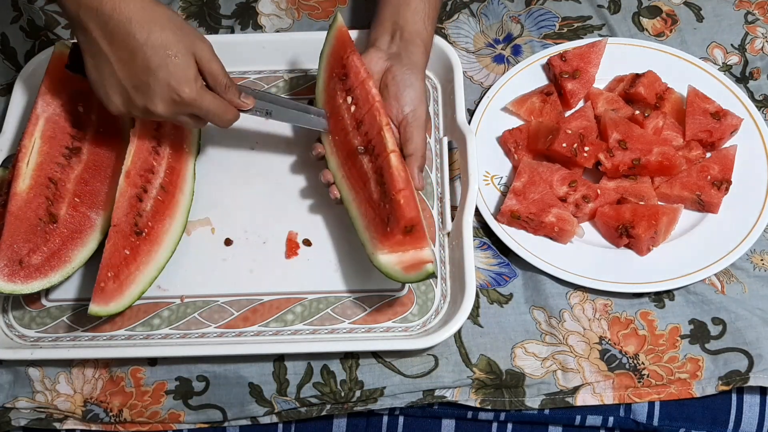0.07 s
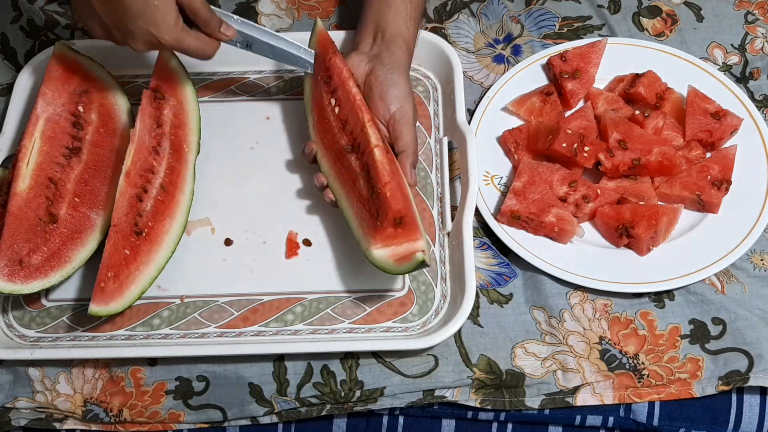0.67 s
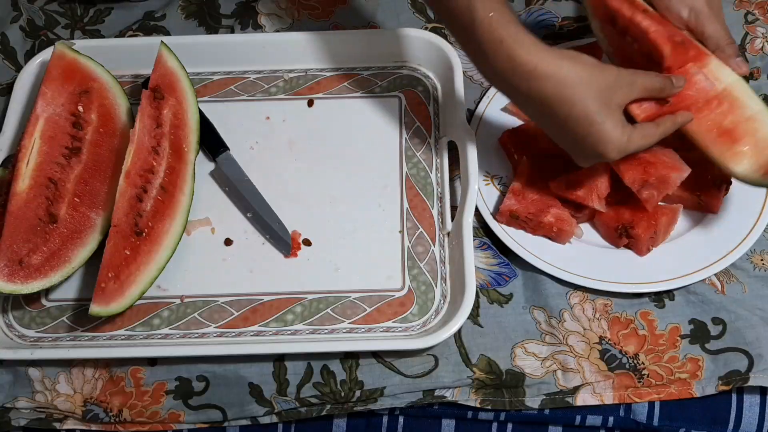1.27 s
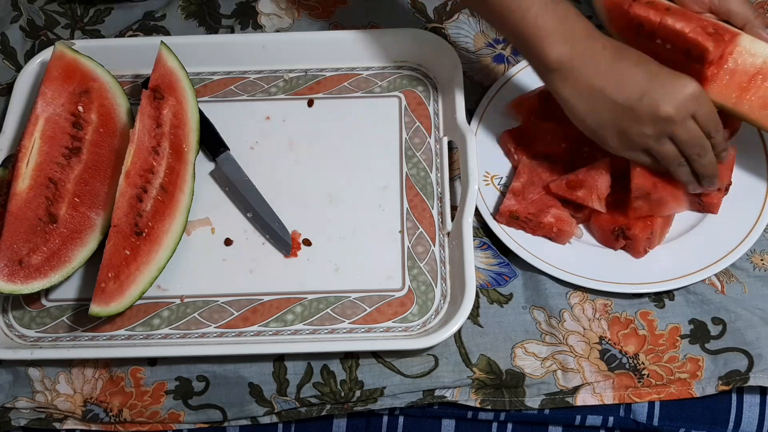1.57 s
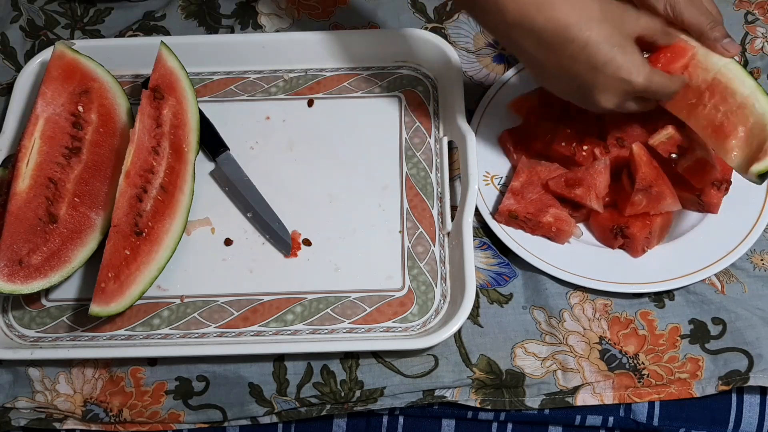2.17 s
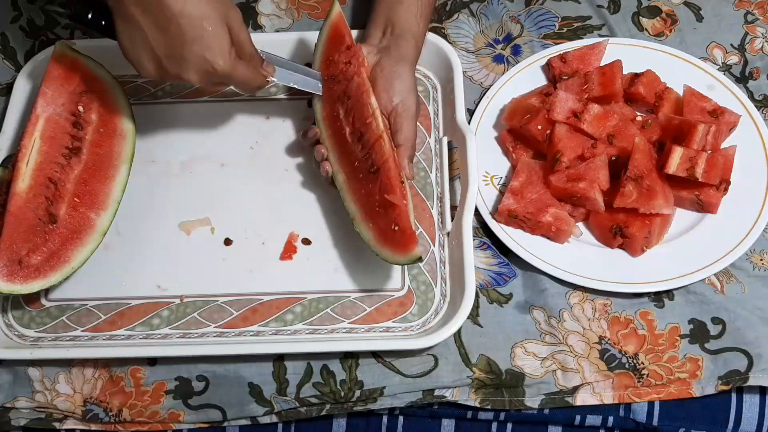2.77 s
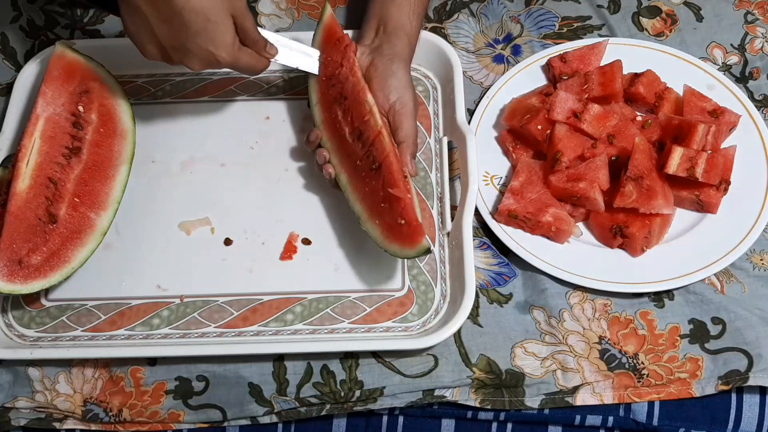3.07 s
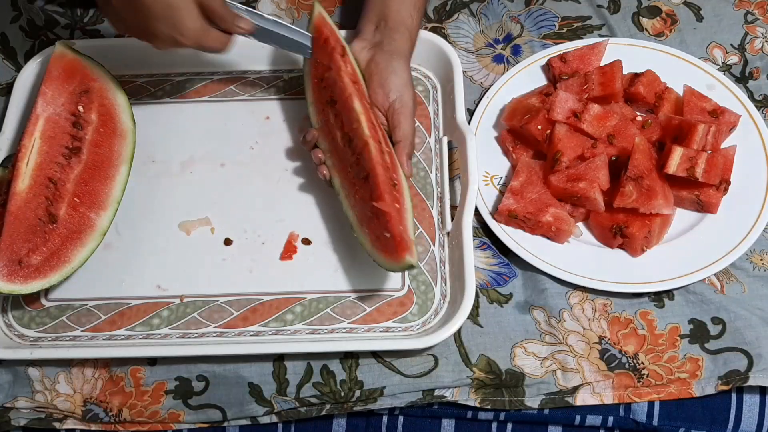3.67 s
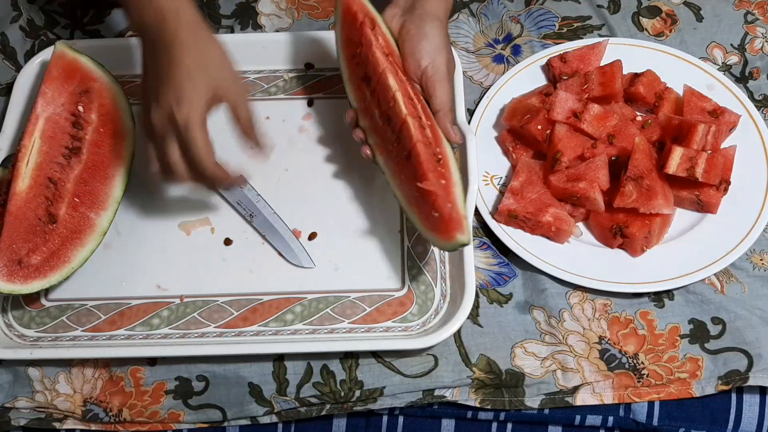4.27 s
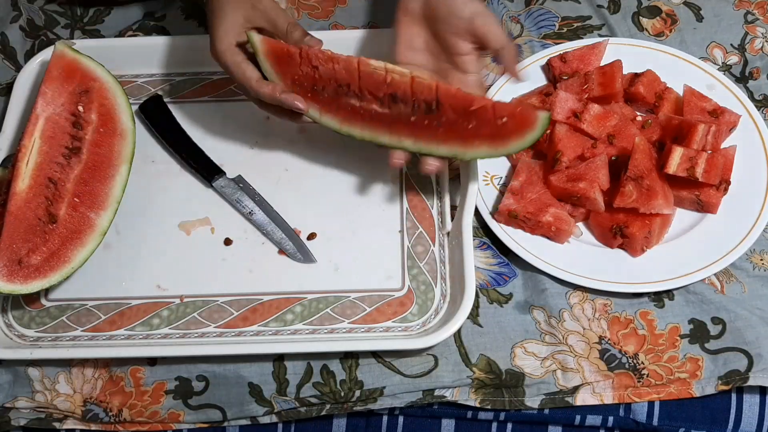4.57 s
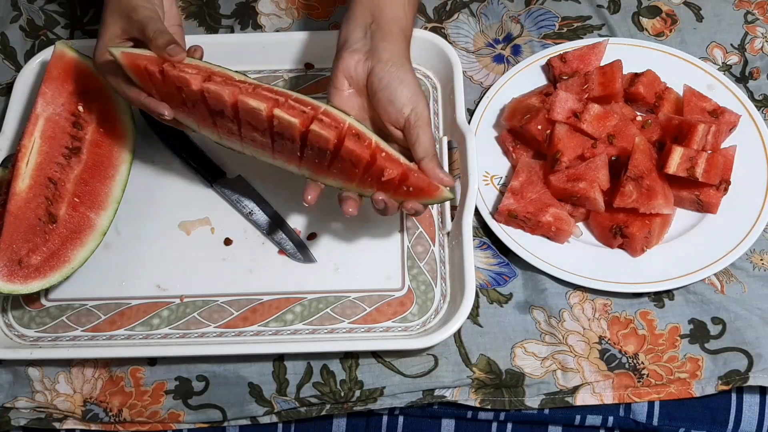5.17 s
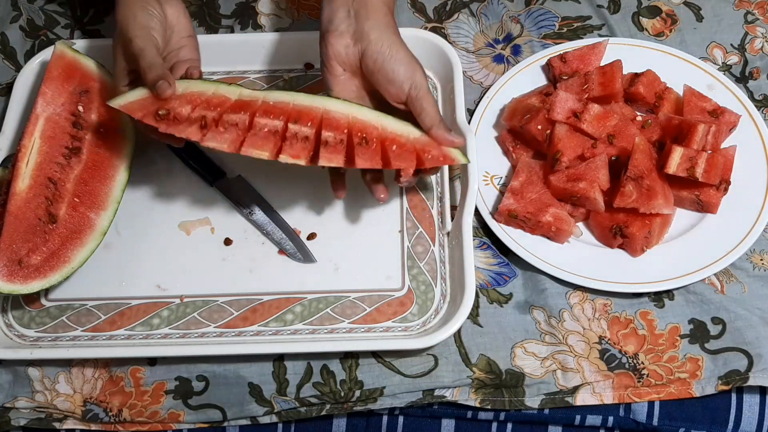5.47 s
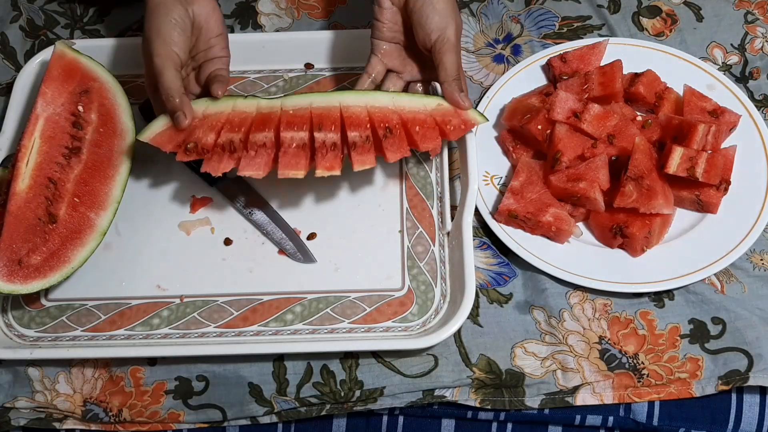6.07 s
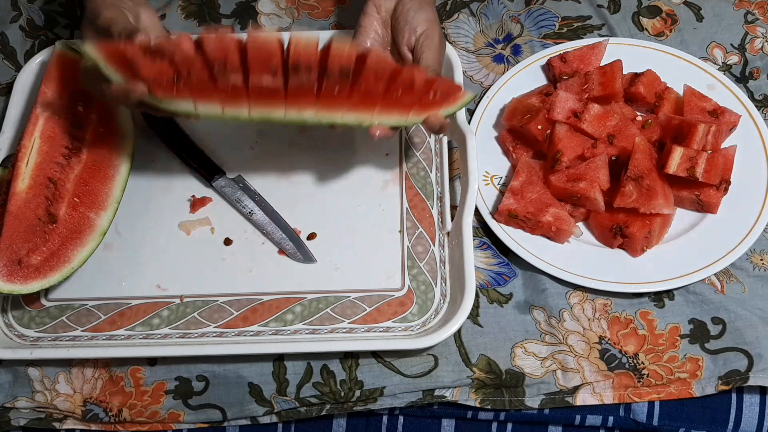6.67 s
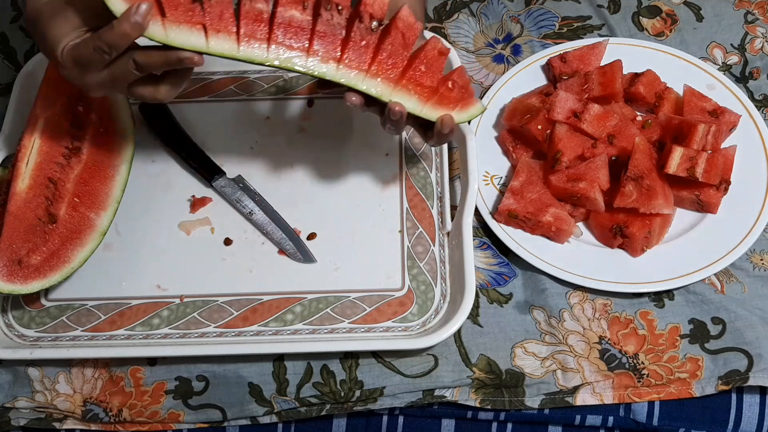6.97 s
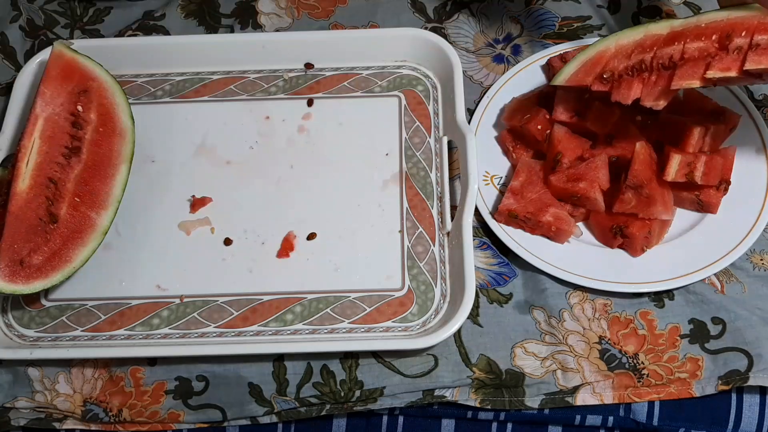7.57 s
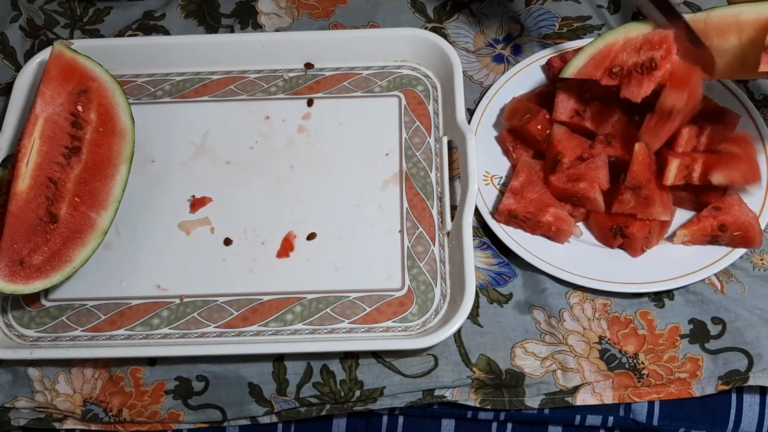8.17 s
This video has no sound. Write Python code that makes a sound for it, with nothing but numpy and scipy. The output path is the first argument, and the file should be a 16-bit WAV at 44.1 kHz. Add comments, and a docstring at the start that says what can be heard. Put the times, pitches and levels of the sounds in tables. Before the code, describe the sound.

A knife rasps through crisp, wet watermelon with juicy ticks, then clacks down on a plastic tray, over a low fan drone.

```python
"""A knife rasps through crisp, wet watermelon, its cells bursting in clumps of tiny clicks.
Small room, stereo microphones just above the table; a fan drones behind, and a faint hum soon stops.
Fingers pull chunks off the rind with juicy ticks, over a plastic tray and a plate further to the right.
Midway the knife is laid on the tray: the tip taps twice, then the handle falls with a clack and bounces.
The cutting resumes near the end. Three times the whole sound dips briefly."""
import sys
import numpy as np
from scipy import signal
from scipy.fft import rfft, irfft, next_fast_len
from scipy.io import wavfile
from scipy.ndimage import map_coordinates

SR = 44100
rng = np.random.default_rng(int(sys.argv[2]) if len(sys.argv) > 2 else 0)


def generate_wav(sig):
    """Save sig (samples, or channels by samples) to the path in sys.argv[1] as 16-bit PCM at SR."""
    pcm = np.round(np.clip(np.atleast_2d(sig).T, -1, 1) * 32767).astype(np.int16)
    wavfile.write(sys.argv[1], SR, pcm)


N = 366471
TIME = np.arange(N) / SR

# likeness of the two microphones in diffuse sound: frequency_hz, correlation
MIC_LIKENESS = [(30, 0.67), (130, 1), (300, 0.75), (640, 0.36), (1400, 0.045), (3000, -0.44), (7000, 0.066)]
# spectra of the background hiss and the fan's air rumble: frequency_hz, relative_db
HISS_SPECTRUM = [(410, -30), (700, -5.5), (2050, -7.5), (2280, -8), (3270, -3), (4350, -10), (5020, -8.5),
                 (8000, -12), (11100, -9.5), (15500, -10)]
FAN_SPECTRUM = [(12, -47), (20, -12), (43, -18), (75, -16), (97, -20), (114, -8), (161, -4), (177, -7.5),
                (222, -12.5), (277, -17), (310, -13), (363, -24), (484, -27.5), (900, -41.5), (1170, -75),
                (1980, -120)]
# the fan's two beating tones: time_s, upper_level_db, lower_level_db
FAN_TONE_LEVELS = [(0, -80, -74), (.6, -65, -59.5), (1.2, -71, -69.5), (2.3, -79.5, -73),
                   (3.1, -61.5, -63.5), (4.7, -73.5, -80.5), (6.9, -59, -75.5), (8.31, -65.5, -79)]
# knife and rind meeting the tray: start_s, thud_db, crack_db, cutoff_hz (higher for a harder contact)
TRAY_CONTACTS = [(4.126, -46, -27.5, 13900), (4.171, -45, -36, 900), (4.2001, -46.5, -32.5, 9500),
                 (4.2013, -41, -37, 2963), (4.2502, -35, -25, 5950), (4.2536, -21, -18, 1910),
                 (4.3043, -35.5, -35, 1000), (4.3247, -33.5, -34.5, 1370), (5.6656, -55, -53, 3800)]
# modes of tray and table: pitch_hz, level_db (against the thud), t60_s
TRAY_MODES = [(116, -11.5, 0.11), (173.1, -16.5, 0.46), (226, 1.5, 0.1), (281.6, -2.5, 0.14),
              (331, -2.5, 0.069), (500, -16.5, .16), (566.6, -16.5, 0.14), (687, -13, 0.046),
              (730, -7, 0.046), (842, -18.5, 0.097), (1083, -16, 0.081), (1350, -14, 0.071),
              (1560, -22.5, .06), (1800, -22.5, 0.17), (2490, -23.5, 0.12), (2860, -29.5, 0.1)]
# the knife's own short ring: pitch_hz, level_db (against the crack), t60_s
BLADE_MODES = [(1040, -15, .05), (1204, -20.5, .06), (1767, -22.5, 0.042), (2850, -22, 0.072),
               (4000, -23.5, .05), (5540, -23.5, 0.035)]
# spectra of a contact's crack, the surface rasp and the deeper crunch: frequency_hz, relative_db
CRACK_SPECTRUM = [(60, -26), (200, -4), (450, 7), (900, 3), (1500, -1.5), (2100, 1.5), (4000, -2),
                  (7500, -6.5), (11000, -12), (15500, -16)]
RASP_SPECTRUM = [(900, -41), (2000, -18.5), (3000, -2.5), (4500, -1.5), (7000, -2), (9000, -2.5),
                 (13000, -4.5), (15500, -6)]
CRUNCH_SPECTRUM = [(300, -13), (850, -15), (1150, -16.5), (1400, -10), (2200, -5), (2800, -5), (4000, -8.5),
                   (8000, -32.5)]
# juice films and fibres snapping or squeaking: start_s, level_db, pitch_hz, length_s (to fall 20 dB)
JUICE_SNAPS = [(.008, -48, 2200, 0.044), (.284, -44.5, 10700, 0.0024), (.2945, -42, 8800, 0.0031),
               (.301, -39, 7700, 0.0036), (0.309, -52, 7600, .008), (0.334, -47, 6100, 0.0027),
               (1.0595, -54, 4940, 0.0043), (1.0952, -44, 5860, 0.0022), (1.13, -39, 6100, 0.0026),
               (1.17, -49, 4850, 0.017), (1.212, -40, 6230, 0.0013), (1.2333, -37.5, 5570, .0015),
               (1.2657, -45, 4440, 0.027), (1.273, -51, 4600, 0.021), (1.286, -58.5, 850, 0.023),
               (1.2897, -36, 3600, 0.01), (1.48, -77.5, 3900, 0.71), (7.347, -60, 9250, .0028),
               (7.471, -51, 11000, .0087), (7.484, -49, 8550, .0086), (7.603, -54, 5960, 0.0032),
               (8.067, -46.5, 5000, .0035), (8.276, -50, 7400, .018)]
# knife strokes: start_s, attack_s, hold_s, level_db, crunch_db (against the rasp), slit_pitch_hz
KNIFE_STROKES = [(0, 0.002, 0.025, -53, -5.5, 2180), (.146, 0.021, 0.042, -58, -6, 2640),
                 (.283, 0.021, 0.12, -64.5, -8, 7600), (.42, 0.035, 0.022, -56, -6, 2400),
                 (.61, 0.016, 0.035, -73, -27, 7400), (.703, 0.0088, 0.017, -58.5, -6.5, 4950),
                 (.745, 0.031, 0.019, -65, -7, 7460), (2.712, 0.0048, 0.016, -64.5, 0, 2500),
                 (2.874, 0.035, 0.022, -55, -7.5, 2640), (3.025, 0.017, 0.08, -66.5, -14.5, 5000),
                 (3.21, 0.022, 0.0225, -58.5, -8.5, 2730), (3.32, .04, 0.066, -70.5, -11, 9500),
                 (3.6, 0.012, 0.018, -77, -5.5, 2180), (7.25, 0.018, .13, -79.5, -9, 6500),
                 (7.425, 0.029, 0.069, -59, -12, 9600), (7.629, 0.015, 0.023, -53.5, -6, 4500),
                 (7.665, 0.018, 0.07, -57.5, -4, 2430), (7.815, 0.027, 0.0063, -60.5, -3.5, 4200),
                 (7.872, 0.034, 0.023, -53.5, -5, 3700), (7.99, 0.03, 0.011, -59, -11, 6300),
                 (8.055, 0.027, 0.037, -58, -8.5, 3500), (8.105, 0.022, .02, -58.5, -5, 1900),
                 (8.15, 0.012, .012, -66, -21, 13100), (8.208, 0.017, 0.057, -58.5, -11.5, 6900)]
# fingers tearing the flesh: start_s, attack_s, hold_s, level_db, crunch_db (as above), slit_pitch_hz
FINGER_SQUEEZES = [(1.0, 0.034, .22, -73.5, -17, 5460), (1.24, 0.025, 0.015, -68, 1, 4300),
                   (1.605, 0.055, .005, -68.5, -8.5, 4060), (1.972, .027, 0.072, -70.5, -17, 7540),
                   (2.06, 0.038, 0.0065, -64.5, -14, 7700), (2.18, 0.028, .005, -81, -18, 7600),
                   (4.508, 0.011, .11, -77.5, -7.5, 4500), (4.6, 0.091, 0.016, -71.5, -15.5, 4000),
                   (4.89, .03, .02, -79, -18, 7000)]
# the hands hold the fruit over the plate, otherwise over the tray: start_s, end_s
PLATE_SPANS = [(.9, 2.7), (7.15, 8.4)]
# brief dips of the whole sound: quietest_s, fall_s, recovery_s
LEVEL_DIPS = [(.868, 0.023, 0.12), (2.705, 0.042, 0.017), (7.203, 0.12, 0.097)]


def from_db(db):
    """Decibels to gain."""
    return 10 ** (np.asarray(db) / 20)


def unit_rms(x):
    """Scale to unit rms."""
    return x / np.sqrt(np.mean(x ** 2) + 1e-20)


def at_hz(points, hz):
    """Read a curve on a log-frequency axis."""
    point_hz, value = np.transpose(points)
    return np.interp(np.log(hz + 1), np.log(point_hz), value)


def colour(x, spectrum):
    """Minimum-phase filter with the given spectrum; white noise keeps its power."""
    size = 2 * next_fast_len(x.shape[-1] // 2 + 2048)
    gain = unit_rms(from_db(at_hz(spectrum, np.arange(size // 2 + 1) * SR / size)))
    cepstrum = irfft(np.log(gain))
    cepstrum[1:size // 2] *= 2
    cepstrum[size // 2 + 1:] = 0
    return irfft(rfft(x, size) * np.exp(rfft(cepstrum)), size)[..., :x.shape[-1]]


def butter(x, kind, hz, order=2):
    """Butterworth filter."""
    return signal.sosfilt(signal.butter(order, hz, kind, fs=SR, output="sos"), x)


def resonate(x, hz, q):
    """Ring a single resonance."""
    return signal.lfilter(*signal.iirpeak(hz, q, fs=SR), x)


def drift(rate_hz):
    """Smooth random wander of unit rms."""
    knots = rng.standard_normal(8192)
    return unit_rms(map_coordinates(knots, [TIME * rate_hz * 2], order=3, mode="wrap"))


def add(track, start_s, sound):
    """Mix a short sound into a track."""
    start = round(start_s * SR)
    track[..., start:start + sound.shape[-1]] += sound[..., :N - start]


def pan(balance_db):
    """Gains at the two microphones for a level difference, left minus right."""
    return from_db(np.array([[.5], [-.5]]) * balance_db)


def by_place(at_tray, at_plate):
    """A value that follows the hands between tray and plate."""
    over_plate = sum((TIME >= start_s) & (TIME < end_s) for start_s, end_s in PLATE_SPANS)
    return np.where(over_plate, at_plate, at_tray)


def direct_path(x):
    """Sound from the hands reaches the two microphones a fraction of a millisecond apart."""
    left_lag_ms = by_place(at_tray=-.053, at_plate=.16)
    return np.array([np.interp(TIME - left_lag_ms / 1000, TIME, x), x])


def diffuse(size):
    """White noise reaching the microphones from all sides: alike in the bass, much less so above."""
    mid, side = rfft(rng.standard_normal((2, size)))
    alike = np.clip(at_hz(MIC_LIKENESS, np.arange(len(mid)) * SR / size), -.99, .995)
    return irfft(np.sqrt((1 + alike) / 2) * mid + np.sqrt((1 - alike) / 2) * side * [[1], [-1]], size)


def room(power, wet_db, near_db, t60_s=.17, wall_delay_s=.017):
    """Diffuse sound fed by a source's power: near scatter off things on the table, then the walls."""
    t = TIME[:SR // 3]
    near_weight = np.interp(t, [.9 * wall_delay_s, wall_delay_s], [from_db(near_db) ** 2, 1])
    decay = from_db(-60 * t / t60_s) ** 2 * near_weight
    stored = signal.fftconvolve(power, decay / decay.sum())[:len(power)]
    return from_db(wet_db) * np.sqrt(np.maximum(stored, 0)) * diffuse(len(power))


def hiss(level_db):
    """A faint, even hiss from all around."""
    return from_db(level_db) * colour(diffuse(N), HISS_SPECTRUM)


def fan(rumble_db, tones_hz, waver_hz, flutter_db):
    """The fan fills the room with air rumble and two wavering low tones that beat."""
    out = from_db(rumble_db) * colour(diffuse(N), FAN_SPECTRUM)
    times_s, *tone_levels_db = np.transpose(FAN_TONE_LEVELS)
    for hz, levels_db in zip(tones_hz, tone_levels_db):
        phase = 2 * np.pi * np.cumsum(hz + waver_hz * drift(6)) / SR
        level_db = np.interp(TIME, times_s, levels_db) + flutter_db * drift(7)
        out += from_db(level_db) * np.sin(phase)
    return out


def hum(pitch_hz, level_db, whirr_db, stop_s, release_db_per_s):
    """A faint steady tone with a soft whirr above it; both die away."""
    tone = np.sqrt(2) * np.sin(2 * np.pi * pitch_hz * TIME)
    whirr = unit_rms(butter(diffuse(N), "band", hz=[450, 900]))
    envelope = from_db(level_db - release_db_per_s * np.clip(TIME - stop_s, 0, 1))
    return envelope * (tone + from_db(whirr_db) * whirr)


def ringing(modes, t):
    """A struck body rings with one dying sine per mode."""
    return np.array([from_db(db - 60 * t / t60) * np.sin(2 * np.pi * hz * t) for hz, db, t60 in modes])


def tray_knocks(crack_s, uneven_db, wet_db, lowest_hz):
    """Each contact cracks briefly and sets tray and blade ringing; soft contacts are dull."""
    out, t = np.zeros((2, N)), TIME[:SR // 3]
    modes = ringing(TRAY_MODES, t)
    blade = ringing(BLADE_MODES, t).sum(axis=0)
    burst = np.exp(-t / crack_s)
    for start_s, thud_db, crack_db, cutoff_hz in TRAY_CONTACTS:
        thud = from_db(thud_db + uneven_db * rng.standard_normal(len(modes))) @ modes
        crack = colour(burst * diffuse(len(t)) + room(burst ** 2, wet_db, near_db=-2.5), CRACK_SPECTRUM)
        add(out, start_s, butter(thud + from_db(crack_db) * (crack + blade), "low", cutoff_hz))
    return butter(out, "high", lowest_hz, order=3)   # a small tray radiates little deep bass


def juice_snaps(q, splash_db, wet_db):
    """A juice film or fibre snaps in a spray of clicks that rings a small wet pocket."""
    out, t = np.zeros((3, N)), TIME[:SR // 4]   # rows: direct, left and right reflections
    for start_s, level_db, pitch_hz, length_s in JUICE_SNAPS:
        decay = from_db(-20 * t / length_s)
        clicks = rng.choice([-1, 1], len(t)) * decay
        spray = np.vstack([clicks, room(decay ** 2, wet_db, near_db=1)])
        pocket = unit_rms(resonate(spray, pitch_hz, q))
        splash = unit_rms(colour(spray, RASP_SPECTRUM))
        snap = pocket + from_db(splash_db) * splash
        add(out, start_s, from_db(level_db) * snap * np.linalg.norm(decay) / np.linalg.norm(snap[0]))
    return direct_path(out[0]) + out[1:]


def juice_pockets(x, q, ring_db, spread_db, changes_per_s):
    """Juice pockets open and close in the cut: narrow resonances come and go at unchanged total power."""
    out, knots_s = x.copy(), np.arange(0, TIME[-1] + 1, 1 / changes_per_s)
    for hz in np.geomspace(1500, 12000, 24):
        opening_db = ring_db + spread_db * rng.standard_normal(1024)[:len(knots_s)]
        out += np.interp(TIME, knots_s, from_db(opening_db)) * resonate(x + 1e-18, hz, q)
    return unit_rms(out) * np.sqrt(np.mean(x ** 2))


def bursting_cells(per_s=5000, spread_db=3.5, clump_db=2.5):
    """Cell walls give way in clumps of tiny, uneven clicks, heard directly and off the room."""
    sizes = from_db(spread_db * np.minimum(rng.exponential(1, N), 4)) * rng.choice([-1, 1], N)
    bursts = rng.random(N) < per_s / SR
    clicks = unit_rms(sizes * bursts * from_db(clump_db * drift(110)))
    return direct_path(clicks) + room(clicks ** 2, wet_db=0, near_db=3)


def gesture(t, attack_s, hold_s, sag_db_per_s, release_db_per_s, seep_db=-19.5, seep_db_per_s=55):
    """Envelope of a cut or squeeze: it builds, sags as the hand slows, stops, and juice fizzes on."""
    held_s = np.clip(t - attack_s, 0, hold_s)
    after_s = np.maximum(t - attack_s - hold_s, 0)
    ending_db = np.maximum(-release_db_per_s * after_s, seep_db - seep_db_per_s * after_s)
    return np.minimum(t / attack_s, 1) * from_db(ending_db - sag_db_per_s * held_s)


def melon_flesh(squelch_db, slit_q, lowest_hz):
    """Under knife and fingers, surface cells rasp, deeper tearing crunches and the wet slit rings."""
    surface = bursting_cells()
    rasp = colour(surface, RASP_SPECTRUM)
    crunch = colour(bursting_cells(), CRUNCH_SPECTRUM)
    knife = dict(sag_db_per_s=20, release_db_per_s=272)
    fingers = dict(sag_db_per_s=4, release_db_per_s=247)
    out = np.zeros((2, N))
    for moves, fade in ((KNIFE_STROKES, knife), (FINGER_SQUEEZES, fingers)):
        for start_s, attack_s, hold_s, level_db, crunch_db, slit_pitch_hz in moves:
            now = slice(*np.searchsorted(TIME, [start_s, start_s + 1]))
            squelch = unit_rms(resonate(surface[:, now], slit_pitch_hz, slit_q))
            sound = rasp[:, now] + from_db(crunch_db) * crunch[:, now] + from_db(squelch_db) * squelch
            envelope = gesture(TIME[now] - start_s, attack_s, hold_s, **fade)
            out[:, now] += from_db(level_db) * envelope * sound
    return butter(out, "high", lowest_hz, order=5)   # cells are too small to sound low


def scene():
    """Fruit and tray close to the microphones, a little to the right, with the fan behind."""
    flesh = melon_flesh(squelch_db=-7, slit_q=6, lowest_hz=1094)
    fruit = juice_pockets(flesh, q=57, ring_db=-13, spread_db=9.5, changes_per_s=25)
    fruit += juice_snaps(q=2.5, splash_db=-5, wet_db=-4)
    knocks = tray_knocks(crack_s=.0018, uneven_db=.5, wet_db=-1, lowest_hz=107.3)
    drone = fan(rumble_db=-63, tones_hz=(166.5, 149), waver_hz=1.5, flutter_db=.5)
    drone += hum(pitch_hz=456.6, level_db=-62, whirr_db=-17.5, stop_s=.65, release_db_per_s=354)
    background = pan(-1.8) * drone + pan(-1.2) * hiss(level_db=-76)
    return background + pan(-1.6) * knocks + pan(by_place(at_tray=-2.5, at_plate=-6)) * fruit


def level_dips(depth_db, recovery_exponent):
    """Gain of the brief dips: an even fall in dB, then a curved return."""
    gain, bottom = np.ones(N), from_db(depth_db)
    for quietest_s, fall_s, recovery_s in LEVEL_DIPS:
        t = TIME - quietest_s
        falling = from_db(depth_db * np.clip(1 + t / fall_s, 0, 1))
        rising = bottom + (1 - bottom) * np.clip(t / recovery_s, 0, 1) ** recovery_exponent
        gain *= np.where(t < 0, falling, rising)
    return gain


def record(dry):
    """The level dips briefly three times, and the treble is cut steeply above 15.7 kHz."""
    treble_cut = signal.ellip(10, .1, 70, 15700, fs=SR, output="sos")
    return signal.sosfilt(treble_cut, dry * level_dips(depth_db=-44, recovery_exponent=1.72))


dry = scene()
out = record(dry)
generate_wav(out)
```